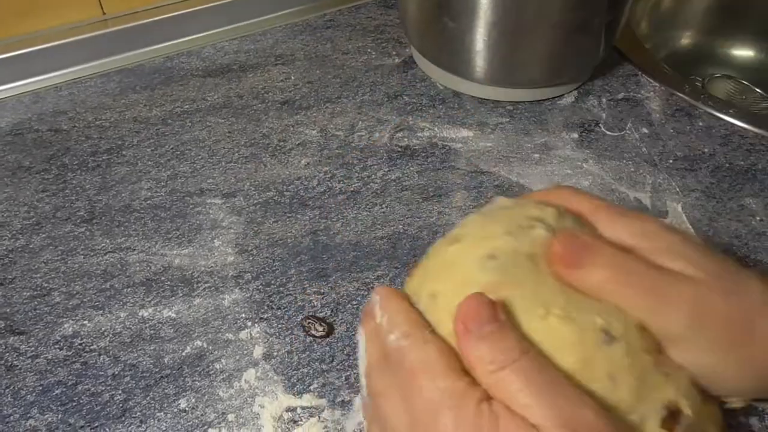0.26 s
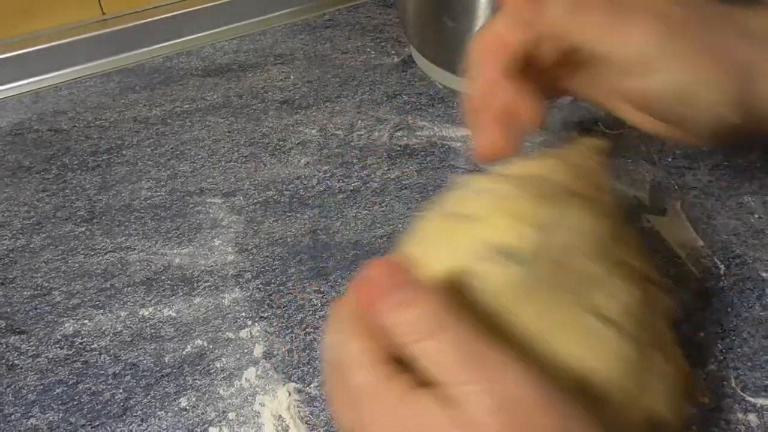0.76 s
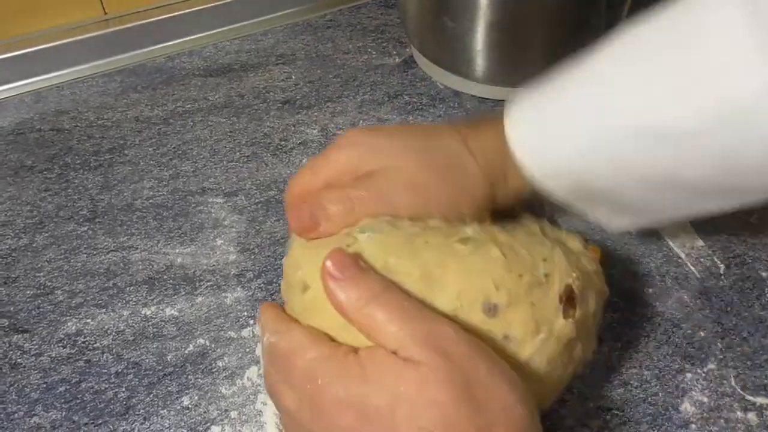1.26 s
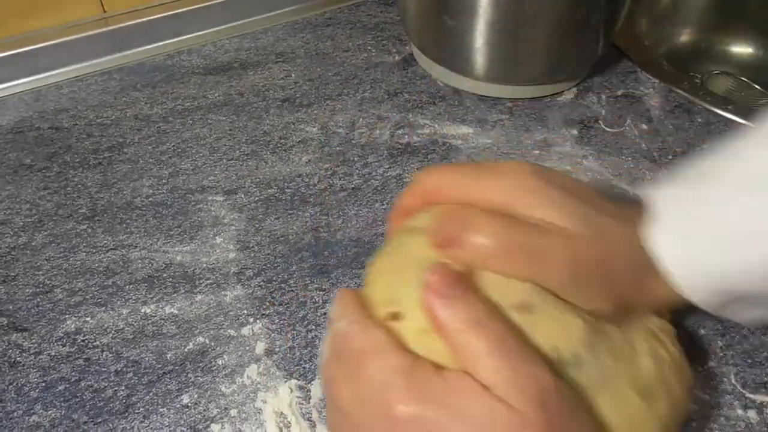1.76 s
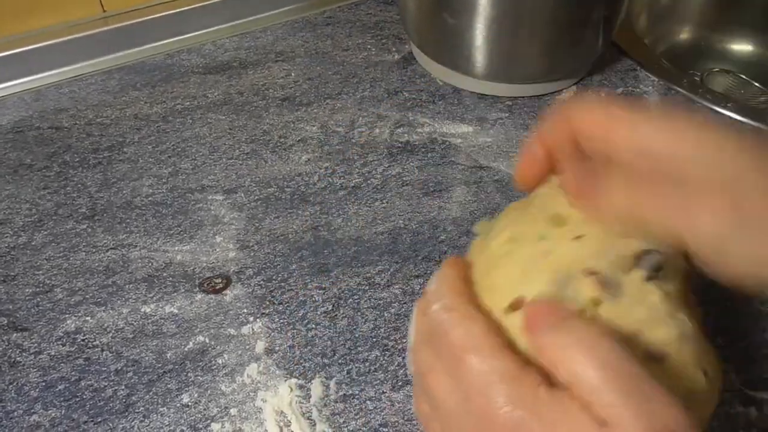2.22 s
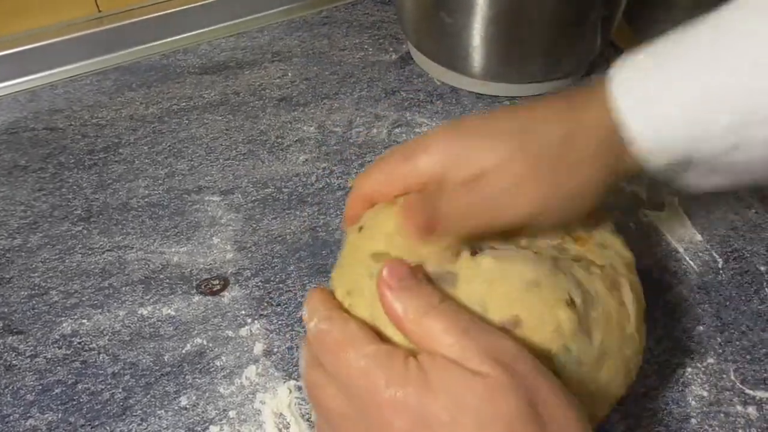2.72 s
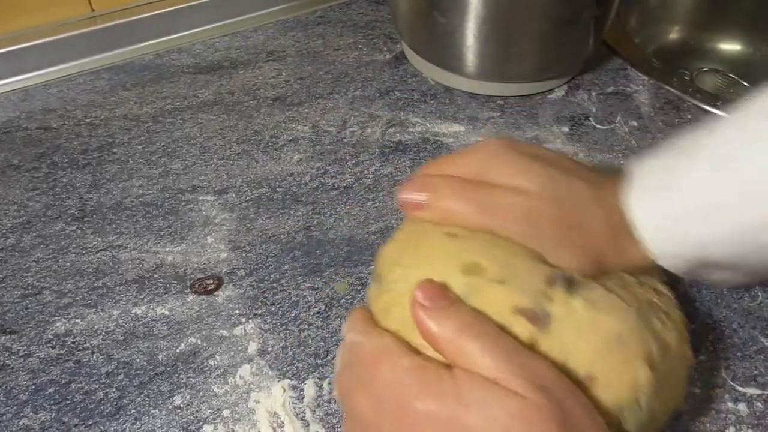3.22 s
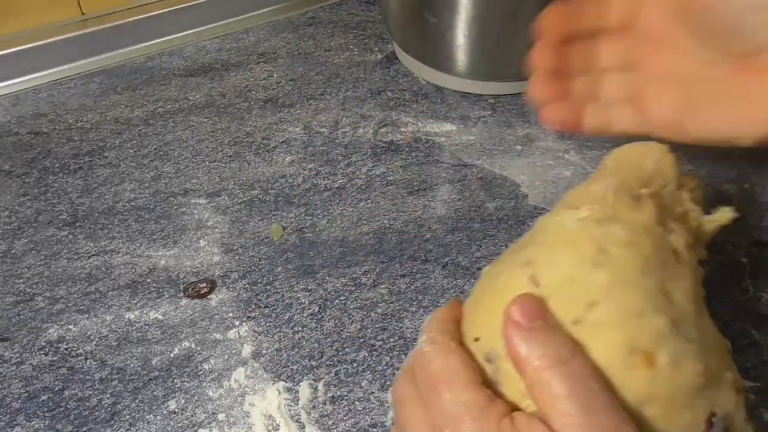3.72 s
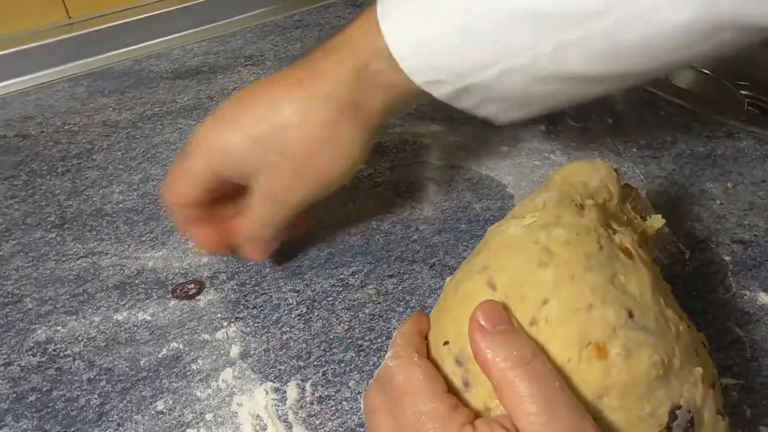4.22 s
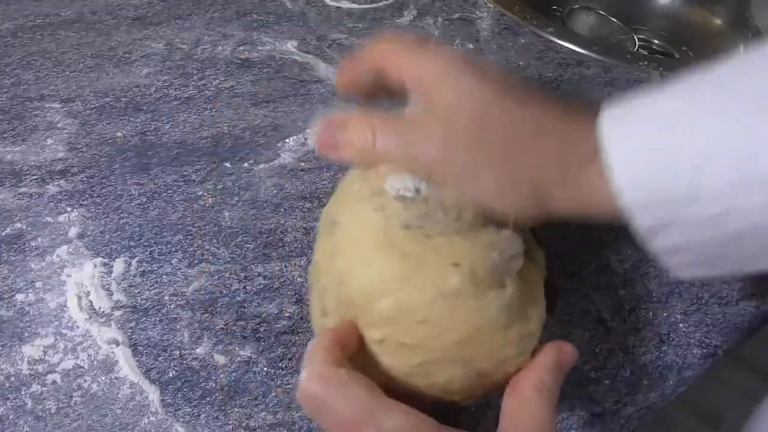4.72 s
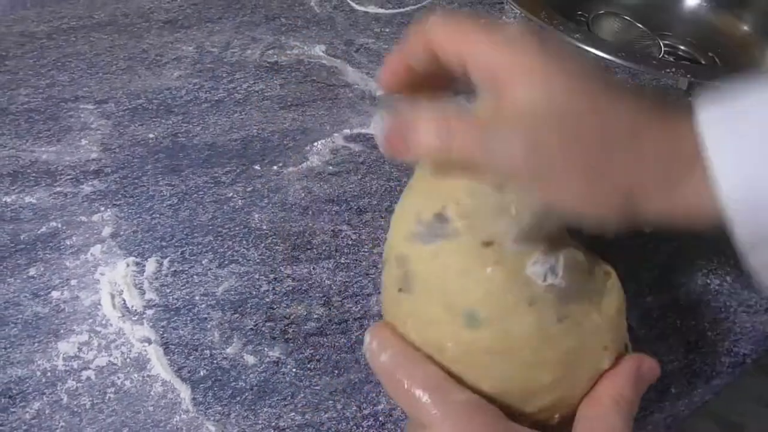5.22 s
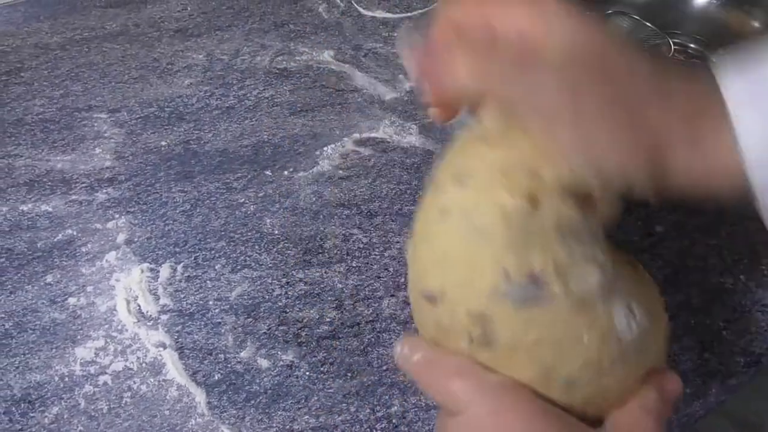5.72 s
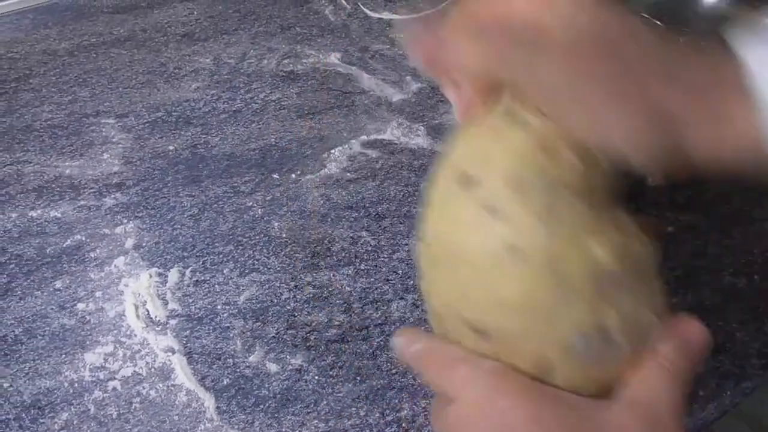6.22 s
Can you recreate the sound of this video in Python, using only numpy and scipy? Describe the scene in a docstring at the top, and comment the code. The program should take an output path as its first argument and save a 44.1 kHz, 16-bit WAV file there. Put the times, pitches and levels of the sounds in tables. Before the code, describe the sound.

In a small quiet kitchen, heard very close in stereo, hands turn a heavy ball of dough on a floured counter. A short scuff with a low groan opens at once, then a sticky smack and soft thump near 0.3 seconds. A fuller, brighter flour hiss follows from 0.4 to 0.6, with moist pats and scuffs to 0.9. Pushes and softer draws repeat around 1.1, 1.8, 2.5 and 3.2, with dull rustling, a small tick at 2.4 and a thump and smack near 3.25. Stroking pauses; a sharp bright click lands at 3.8 among lighter ticks, then the deepest thump at 4.1, a tiny squeak and more ticks until 4.3. Gentler strokes resume at 4.4, 4.9, 5.5 and 6.0, with a faint squeak at 5.6, dull smack and thump near 5.9 and a last scuff at 6.2. Faint air and low hum remain throughout.

```python
"""A small kitchen: two hands turn a ball of fruit dough on a floured counter, close to the microphones.
Dense random grains make the flour hiss under each push and draw, and the dull rustle of the heavy dough.
Stick-slip groans scuff, noise bursts smack, narrow noise squeaks, and damped counter modes thump.
A few hard bits tick as short ringing noise. Behind lie a short room wash, quiet air and an appliance's hum."""
import sys
import numpy as np
from scipy import signal
from scipy.fft import rfft, irfft
from scipy.io import wavfile
from scipy.ndimage import uniform_filter1d

SR = 44100
rng = np.random.default_rng(int(sys.argv[2]) if len(sys.argv) > 2 else 0)


def to_wav(s):
    """Save 16-bit WAV."""
    ch = np.atleast_2d(s).T  # columns
    pcm = np.round(np.clip(ch, -1, 1) * 32767)  # PCM
    wavfile.write(sys.argv[1], SR, pcm.astype(np.int16))


N = 285327
TIME = np.arange(N) / SR

# Turns of the ball, each a push, a pause and a draw back: (start [s], push length [s], push level [dB],
# pause [s], draw length [s], draw level [dB])
TURNS = [(0.039, 0.11, -54, 0.12, 0.039, -60.5), (.40, .19, -49.5, 0.047, 0.25, -62),
         (1.068, .25, -52, .05, 0.25, -63), (1.763, .14, -53.5, 0.079, .29, -61),
         (2.497, 0.2, -59.5, 0.037, .25, -57), (3.17, 0.18, -58, 0.069, 0.21, -58),
         (4.405, 0.2, -56.5, 0.023, .16, -56), (4.884, 0.22, -58.5, 0.063, 0.11, -55.5),
         (5.467, .19, -59, 0.074, 0.073, -58), (5.963, .2, -58, 0.049, 0.11, -61.5)]
# Colour of the flour hiss: (frequency [Hz], relative level [dB])
FLOUR_COLOUR = [(1200, -7.5), (2000, -6.5), (2800, -9.5), (4000, -4.5), (5800, -7), (7600, 0), (10300, -1),
                (12500, -2.5), (14500, -13.5), (16000, -39)]
# How heavily the ball bears on the worktop: (time [s], level [dB])
BALL_WEIGHT = [(0.0, -58.5), (0.36, -57), (1.67, -57.5), (2.65, -57.5), (2.88, -60.5), (3.37, -58.5),
               (3.82, -61.5), (4.25, -58.5), (4.54, -56), (5.32, -57), (5.98, -56), (6.47, -58.5)]
# Colour of the worktop rustle: (frequency [Hz], relative level [dB])
DRAG_COLOUR = [(25, -29), (50, -12), (75, -5), (125, 5.5), (170, 1), (230, 3.5), (320, 7), (400, 2.5),
               (500, -0.5), (900, 1), (1350, -9.5), (1900, -22.5), (3500, -19), (7000, -21)]
# Short shoves where the dough grips and slips: (time of peak [s], half length [s], rasp level [dB],
# groan level [dB], groan pitch [Hz])
SCUFFS = [(0.061, 0.01, -49.5, -37, 310.7), (0.111, 0.0092, -57, -51, 304),
          (0.718, 0.012, -54.5, -40.5, 331), (0.801, 0.019, -63, -51, 310), (0.919, 0.017, -56, -51, 374),
          (1.407, 0.012, -55, -48, 378), (1.527, 0.007, -57.5, -55, 300), (2.066, 0.016, -52, -38.5, 335),
          (2.808, 0.019, -50.5, -43, 352), (3.064, 0.027, -57, -70, 334), (3.451, 0.024, -55.5, -48, 340),
          (6.183, .0065, -56, -46, 418.6)]
# Colour of the scuffs' rasp: (frequency [Hz], relative level [dB])
RASP_COLOUR = [(250, -42), (600, 14.5), (1400, 12), (2000, 5), (4000, 4), (7000, -23), (14000, -24)]
# Landings of the dough: (time [s], level [dB], contact [ms], time until the hand damps the counter [s])
THUMPS = [(0.2913, -33.5, 2.7, .05), (0.715, -41.5, 3.3, .04), (0.924, -45, 3.2, .015),
          (1.826, -41.5, 2.8, .08), (3.126, -44, 2.5, .03), (3.273, -35.5, 7.1, .05),
          (4.123, -26, 2.73, .055), (5.9013, -36, 3.3, .05)]
# Ringing modes of the counter: (frequency [Hz], level [dB], time to fall 60 dB [s])
COUNTER_MODES = [(102, -16, 0.29), (127.7, 0, 0.5), (155.6, -9.5, 0.41), (199.6, -6.5, 0.18),
                 (233, -2.5, 0.18), (276, -8.5, 0.49), (314, -13.5, 0.11), (339, -7, 0.24),
                 (375, -12, 0.12), (477, -5, 0.19), (623, -24, .04), (870, -15, .04)]
# Tacky dough smacking against skin: (time [s], level [dB], pitch [Hz], fade [s], crispness [dB])
SMACKS = [(0.2511, -38, 860, 0.0022, -20), (.412, -35, 970, 0.0049, -26), (0.4604, -36, 1050, 0.01, -27),
          (0.501, -42.5, 1100, 0.0053, -18), (.9145, -37, 1020, 0.0074, -11),
          (3.2429, -35, 1070, .010, -11), (3.4245, -47, 2000, 0.0036, -13), (5.708, -43, 1690, .0033, -24),
          (5.836, -32.5, 725, 0.0026, -40)]
# Squeaks of tacky skin: (time [s], length [s], level [dB], pitch [Hz])
SQUEAKS = [(4.178, 0.016, -51.5, 3800), (5.62, 0.076, -61, 2140)]
# Small hard bits hitting the worktop, and at 4.24 s a faint crackle of tacky skin: (time [s], level [dB], time
# to fall 60 dB [s], pitch [Hz], brightness [dB per octave], left minus right [dB])
TICKS = [(2.4476, -25.5, 0.011, 3600, -3.5, 3.5), (3.7935, -38.5, 0.018, 4130, -6.5, 6),
         (3.8151, -14, 0.0097, 10400, -0.3, -4.5), (3.8413, -35, 0.012, 4600, 1, 2),
         (3.885, -39.5, 0.016, 3500, -4, 4), (4.189, -42, .018, 3940, -5, 2),
         (4.24, -53, 0.0099, 5000, -4, 0), (4.292, -34.5, 0.022, 4530, -5, 3)]
# Colour of a tick's crack before its brightness: (frequency [Hz], relative level [dB])
TICK_COLOUR = [(50, -21), (200, -7), (500, -11), (830, -15), (1300, 0), (1800, -9), (2800, -10.5),
               (5000, 0.5), (6400, -9), (8200, 4), (9200, -1), (10200, -6), (12000, -9), (15500, -13)]
# Colour of the quiet kitchen air: (frequency [Hz], relative level [dB])
AIR_COLOUR = [(20, -38), (50, -6.5), (110, -5.5), (175, -6), (260, 0.5), (330, 0), (450, -7.5),
              (900, -11.5), (1400, -10.5), (1900, -24), (5800, -24.5), (8200, -19.5), (11300, -24),
              (15000, -33)]
# Tones of the appliance: (frequency [Hz], level [dB])
HUM_TONES = [(100, -72.5), (300, -59.5), (824, -81)]
# Stereo width, as close microphones hear long waves alike: (frequency [Hz], left-right difference gain [dB])
STEREO_WIDTH = [(60, -4.5), (250, -7), (450, -0.5), (1000, -2), (1800, -4.5), (5500, -1), (8000, 2),
                (15000, 1)]

# Sliding: soft ends of a stroke, and how rounded its rise and fall is
OVERLAP_S, SWELL_POWER = 0.031, 0.27
# Slower, quieter strokes lose treble: neutral level, dB per octave for each dB, extra slope of the light draw
NEUTRAL_DB, BRIGHT_PER_DB, DRAW_BRIGHT_DB = -55, 0.55, 3.5
CREEP_DB = -5.5  # flour that keeps hissing under the ball, relative to its weight
FLUTTER_DB, FLUTTER_PER_S = 1.4, 25  # the hand's speed is never quite even
# Dragging: the rustle grows faster than the load around its usual value
DRAG_DB, LUMPS_DB, DRAG_SLOPE, LOAD_DB = 2, -4, 2.15, -57.5
# Scuffs: flour thrown relative to the rasp, unevenness in strength and in period
PUFF_DB, GRIP_DB, SLIP_JITTER = 5.5, 3.5, .2
GROAN_HZ = 342  # where the counter answers a shove most
SLAP_DB, SLAP_HZ, SLAP_FADE_S = -19.5, 910, 0.018  # air squeezed out at each landing
CRACKLE_DB, CRACKLES_PER_S = 1.5, 900  # fine unevenness of a smack's many little bursts
# Ticks: rise time, nudge to the counter, and the worktop's dull answer
TICK_ATTACK_S, TICK_COUNTER_DB = 0.00014, -33
KNOCK_DB, KNOCK_HZ, KNOCK_FADE_S = -14.5, 836, 0.0044
AIR_DB = -55
ROOM_T60_S, ROOM_DB = 0.26, -16
TOP_HZ = 15500  # upper edge of the microphones' band


def sliding():
    """Flour grains hiss under each push and draw of the hand, louder and brighter with its speed."""
    slips = stereo(grains(16000, 0.48), grains(16000, 1.6), side_db=-5.5, pan_db=-0.5)
    slips = slips * undb(FLUTTER_DB * walk(FLUTTER_PER_S))
    out = colour(slips, FLOUR_COLOUR, tilt_db=-4.5) * undb(weight_db() + CREEP_DB)
    for start, push_s, push_db, pause_s, draw_s, draw_db in TURNS:
        push = start, push_s, push_db, 0
        draw = start + push_s + pause_s, draw_s, draw_db, DRAW_BRIGHT_DB
        for s, length, db, light_db in (push, draw):
            begin = max(s - OVERLAP_S, 0)
            end = s + length + OVERLAP_S
            stroke = slips[:, int(begin * SR):int(end * SR)]
            speed = unit(np.hanning(stroke.shape[1]) ** SWELL_POWER)
            tilt_db = BRIGHT_PER_DB * (db - NEUTRAL_DB) + light_db
            hiss = colour(stroke, FLOUR_COLOUR, tilt_db)
            add(out, begin, undb(db) * hiss * speed)
    return out


def dragging():
    """The heavy ball rubs a dull rustle out of the worktop, and its soft lumps nudge the loaded counter."""
    t = TIME[:SR // 8]
    rubbing = stereo(grains(7000, 0.5), grains(7000, 0.92), side_db=-7.5, pan_db=-4.0)
    rustle = colour(rubbing, DRAG_COLOUR)
    loaded_ring = counter(t) * np.exp(-t / 0.023)
    nudges = signal.fftconvolve(grains(90, 0.64), loaded_ring)[:N]
    lumps = colour(nudges, [(130, -3.5), (380, -11), (650, -23), (1500, -40)])
    load_db = LOAD_DB + DRAG_SLOPE * (weight_db() - LOAD_DB)
    waver_db = walk(30)
    return (rustle + undb(LUMPS_DB) * lumps) * undb(load_db + DRAG_DB + waver_db)


def weight_db():
    """The ball's load on the worktop moves in straight lines between its listed levels."""
    return np.interp(TIME, *np.transpose(BALL_WEIGHT))


def scuffs():
    """Each shove swells and dies: uneven stick-slip groans in the counter, with a rasp and a puff of flour."""
    out = np.zeros((2, N))
    rasp = colour(grains(3500, 2.1), RASP_COLOUR)
    flour = colour(stereo(grains(6000, 1.55), grains(6000, 1.2), side_db=-11), FLOUR_COLOUR)
    friction = rasp + undb(PUFF_DB) * flour
    # time that runs unevenly, so the groan's period jitters
    slip_time = np.cumsum(1 + SLIP_JITTER * walk(550)) / SR
    grip = undb(GRIP_DB * walk(300))
    for s, half, rasp_db, groan_db, hz in SCUFFS:
        near = abs(TIME - s) < 6 * half
        swell = 1 / np.cosh((TIME[near] - s) / half * np.sqrt(2))
        slipping = np.sin(2 * np.pi * hz * slip_time[near]) * grip[near]
        groan = burst(resonate(slipping, GROAN_HZ, 1.14), swell)
        out[:, near] += undb(groan_db) * groan + undb(rasp_db) * swell * friction[:, near]
    return out


def thumps():
    """A soft push slaps the counter and rings it until the pressing hand damps it."""
    out, t = np.zeros((2, N)), TIME[:SR // 2]
    ring = counter(t)
    for s, db, contact_ms, hold in THUMPS:
        push = np.hanning(max(int(contact_ms * SR / 1000), 4))
        damping = undb(np.interp(t, [hold, hold + 0.015], [0, -9]))
        blow = signal.fftconvolve(ring, push / push.sum())[:len(t)] * damping
        add(out, s, undb(db) * stereo(blow, 0, 0, pan_db=5.0))
        add(out, s, pop(db + SLAP_DB, SLAP_HZ, SLAP_FADE_S, crisp_db=-18))
    return out


def counter(t):
    """Damped modes ring the counter after a blow; it is too small to radiate deep bass."""
    ring = sum(undb(db) * np.cos(2 * np.pi * hz * t) * undb(-60 * t / t60)
               for hz, db, t60 in COUNTER_MODES)
    return signal.sosfilt(signal.butter(3, 88, "high", fs=SR, output="sos"), ring)


def smacks():
    """Tiny air pockets between skin and dough burst in a quick cluster."""
    out = np.zeros((2, N))
    for s, db, hz, fade, crisp_db in SMACKS:
        add(out, s, pop(db, hz, fade, crisp_db))
    return out


def pop(db, hz, fade, crisp_db):
    """Crackling noise, hollow around its pitch and crisp at the edge, starts fast and dies away."""
    t = TIME[:SR // 8]
    crackle = undb(CRACKLE_DB * walk(CRACKLES_PER_S)[:len(t)])
    pops = stereo(*rng.standard_normal((2, len(t))), side_db=-6, pan_db=-3.2) * crackle
    hollow_colour = [(hz / 16, -34), (hz / 4, -10), (hz / 2, -3), (hz * 1.14, 0), (hz * 2, -14), (hz * 8, -40)]
    hollow = colour(pops, hollow_colour)
    edge = resonate(resonate(pops, 4200, 0.61), 3200, 1.0)
    envelope = np.exp(-t / fade) * (1 - np.exp(-t / 0.00066))
    return undb(db) * burst(hollow + undb(crisp_db) * edge, envelope)


def squeaks():
    """Skin sticks and slips fast enough to give a brief, narrow chirp."""
    out = np.zeros((2, N))
    for s, length, db, hz in SQUEAKS:
        slips = rng.standard_normal(int(length * SR))
        chirp = resonate(resonate(slips, hz, 5.4), hz, 5.4)
        add(out, s, undb(db) * chirp * np.sqrt(np.hanning(len(slips))))
    return out


def ticks():
    """A hard contact cracks, rings at the bit's own pitch and knocks the worktop, differently at each ear."""
    out, t = np.zeros((2, N)), TIME[:SR // 16]
    for s, db, t60, hz, bright_db, pan_db in TICKS:
        contact = stereo(*rng.standard_normal((2, len(t))), side_db=-3.5, pan_db=pan_db)
        crack = colour(contact, TICK_COLOUR, bright_db)
        ring = resonate(contact, hz, 7.7)
        envelope = undb(-60 * t / t60) * (1 - np.exp(-t / TICK_ATTACK_S))
        add(out, s, undb(db) * burst(crack + undb(-4.0) * ring, envelope))
        add(out, s, undb(db + TICK_COUNTER_DB) * counter(t) * np.exp(-t / .014))
        add(out, s, pop(db + KNOCK_DB, KNOCK_HZ, KNOCK_FADE_S, crisp_db=-1))
    return out


def room(x):
    """Nearby walls return a short, dull wash: noise that starts after 4 ms and dies away."""
    t = TIME[:SR // 2]
    wash_colour = [(100, -16.5), (1200, -4.5), (4000, -16.5), (15000, -24)]
    tail = colour(rng.standard_normal((2, len(t))), wash_colour)
    tail *= undb(-60 * t / ROOM_T60_S) * (t > .004)
    echo = unit(tail) / np.sqrt(len(t))
    return undb(ROOM_DB) * signal.fftconvolve(x, echo, axes=1)[:, :N]


def kitchen():
    """Steady room air is coloured noise; the appliance's tones waver slightly in level and phase."""
    air = colour(stereo(*rng.standard_normal((2, N)), side_db=-1.5), AIR_COLOUR)
    hum = np.zeros(N)
    for hz, db in HUM_TONES:
        level = undb(db + 0.59 * walk(3.92)) * np.sqrt(2)
        hum += level * np.sin(2 * np.pi * hz * TIME + 0.1 * walk(4))
    return undb(AIR_DB) * air + hum


def undb(db):
    """Decibels to gain."""
    return 10 ** (np.asarray(db) / 20)


def unit(x):
    """Scale to an rms of one."""
    return x / np.sqrt(np.mean(x ** 2))


def equalise(x, points, tilt_db=0):
    """Filter by (frequency [Hz], gain [dB]) points and a slope per octave above 1 kHz."""
    octave = np.log2(np.maximum(np.fft.rfftfreq(x.shape[-1], 1 / SR), 1))
    hz, db = np.transpose(points)
    slope_db = tilt_db * np.maximum(octave - np.log2(1000), 0)
    gain = undb(np.interp(octave, np.log2(hz), db) + slope_db)
    return irfft(rfft(x) * gain, x.shape[-1])


def colour(x, points, tilt_db=0):
    """Give a noise a spectrum; rms one."""
    return unit(equalise(x, points, tilt_db))


def resonate(x, hz, q):
    """One broad resonance; rms one."""
    return unit(signal.lfilter(*signal.iirpeak(hz, max(q, .5), fs=SR), x))


def burst(x, envelope):
    """Shape a sound by an envelope, keeping the envelope's energy."""
    return unit(x * envelope) * np.sqrt(np.mean(envelope ** 2))


def walk(rate):
    """A smooth random wander, rms one, with this many new values per second."""
    k = int(SR / rate)
    steps = np.repeat(rng.standard_normal(N // k + 2), k)
    return unit(uniform_filter1d(steps, k)[:N])


def grains(rate, spread_db):
    """Dense tiny slips, most of them weak and a few strong; rms one."""
    hits = rng.random(N) < rate / SR
    strength = undb(spread_db * rng.exponential(size=N))
    return unit(hits * rng.standard_normal(N) * strength)


def stereo(mid, side, side_db, pan_db=0):
    """Left and right from a shared and an opposed part; positive pan leans left."""
    sign = np.array([[1], [-1]])
    return (mid + sign * undb(side_db) * side) * undb(sign * pan_db / 2)


def add(out, s, sound):
    """Mix a sound in from time s."""
    i = int(s * SR)
    out[:, i:i + sound.shape[-1]] += sound[..., :N - i]


def scene():
    """The hands' work, its echo and the kitchen behind."""
    work = sliding() + dragging() + scuffs() + thumps() + smacks() + squeaks() + ticks()
    return work + room(work) + kitchen()


def record(dry):
    """A close pair of microphones narrows the bass, thins its bottom and cuts the top."""
    left, right = dry
    side = equalise((left - right) / 2, STEREO_WIDTH)
    pair = stereo((left + right) / 2, side, 0)
    thin = signal.sosfilt(signal.butter(2, 45, "high", fs=SR, output="sos"), pair)
    return signal.sosfilt(signal.ellip(8, .2, 80, TOP_HZ, fs=SR, output="sos"), thin)


dry = scene()
out = record(dry)
to_wav(out)
```